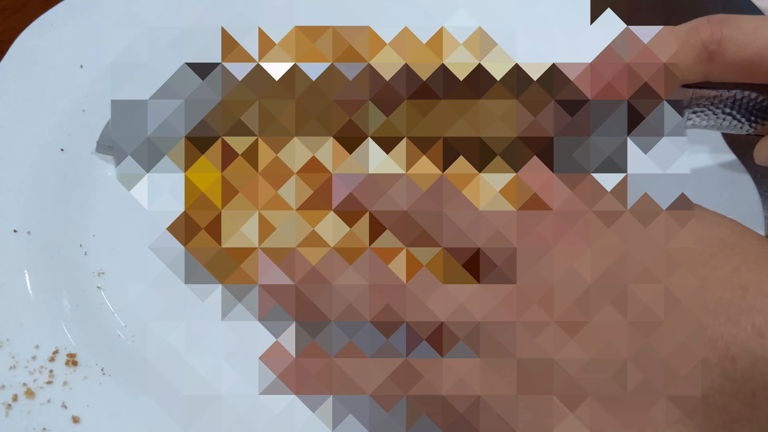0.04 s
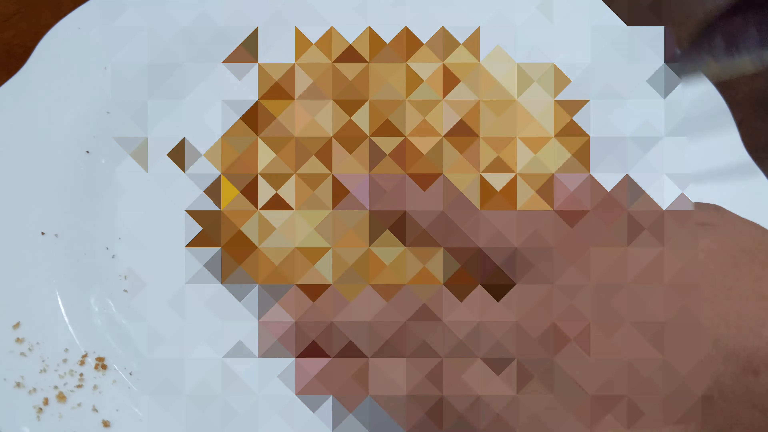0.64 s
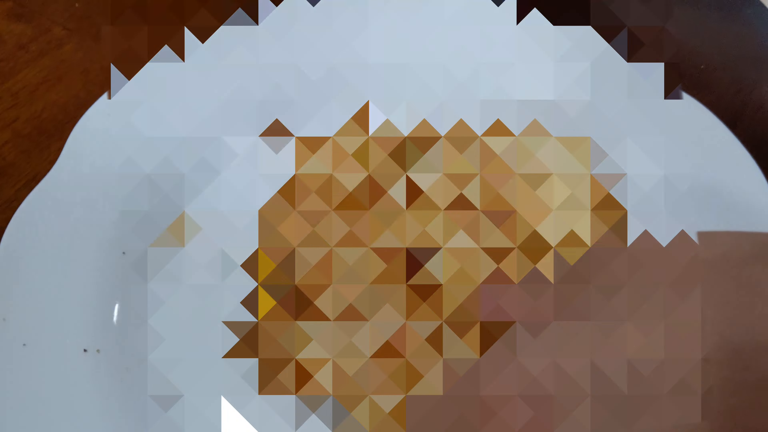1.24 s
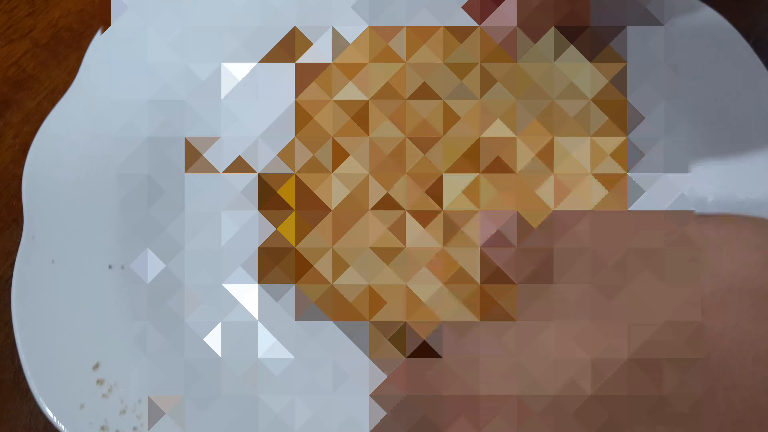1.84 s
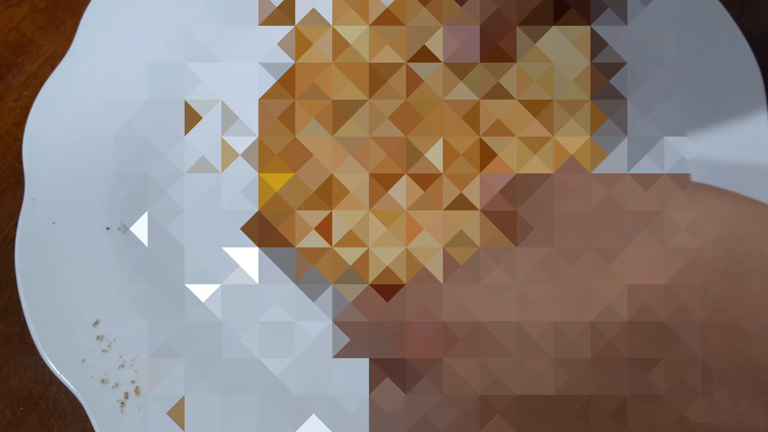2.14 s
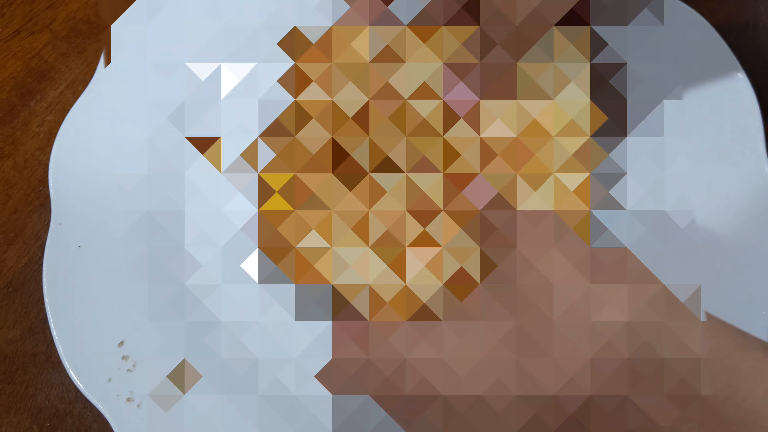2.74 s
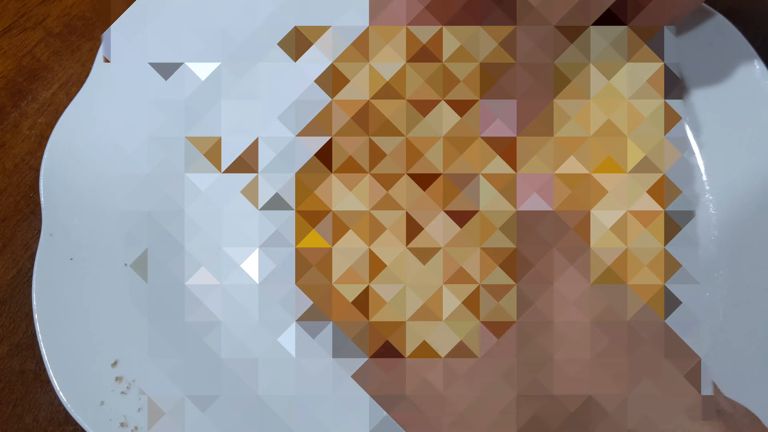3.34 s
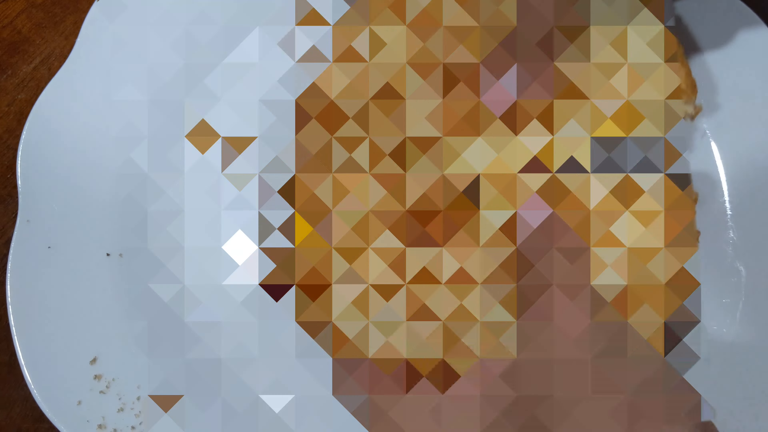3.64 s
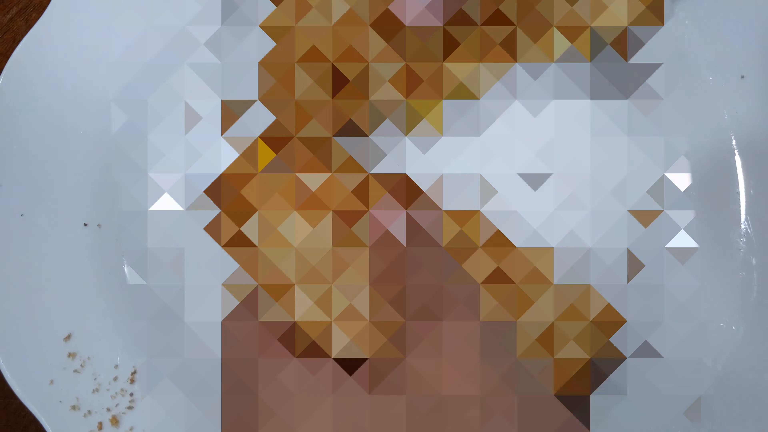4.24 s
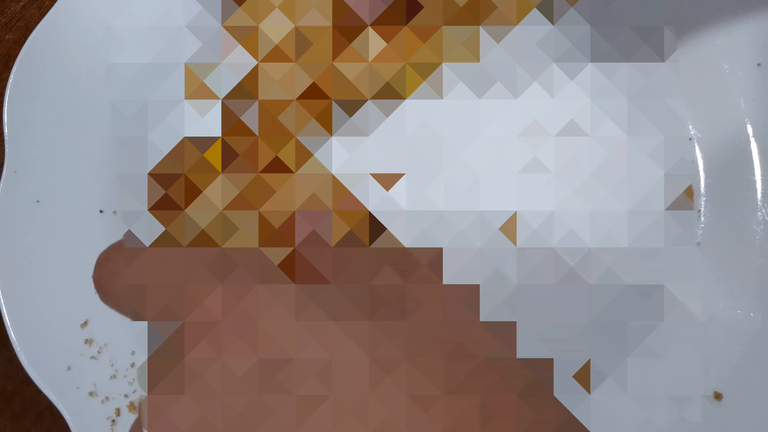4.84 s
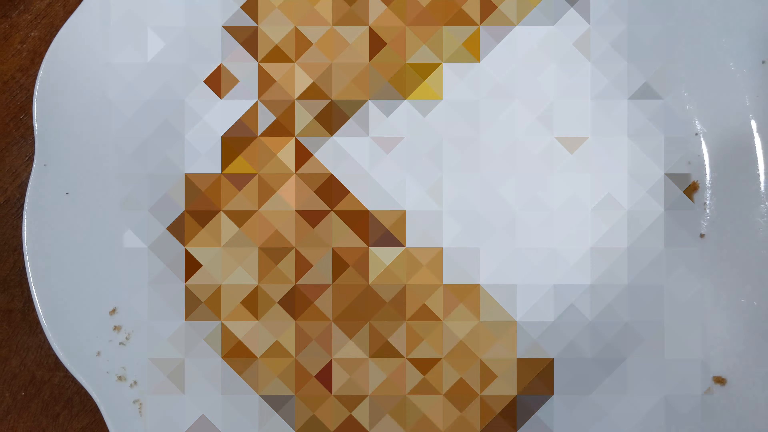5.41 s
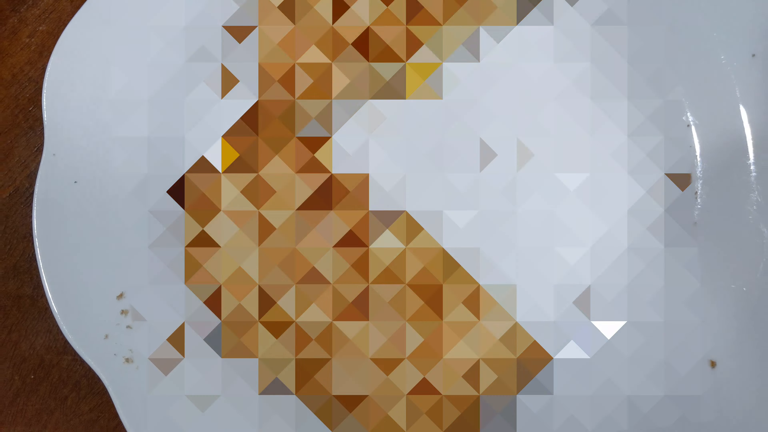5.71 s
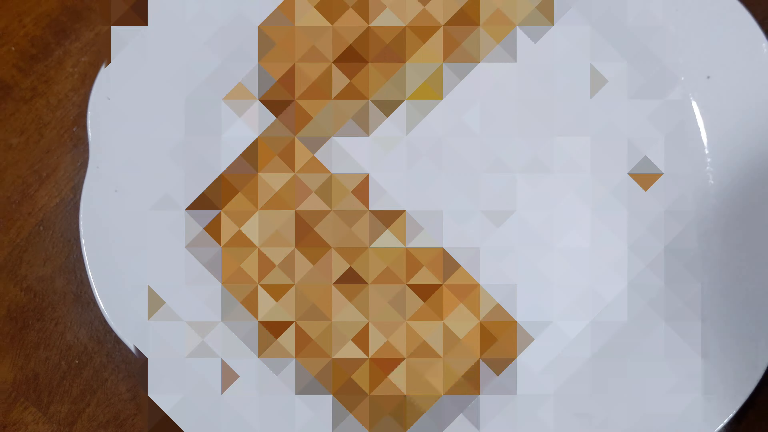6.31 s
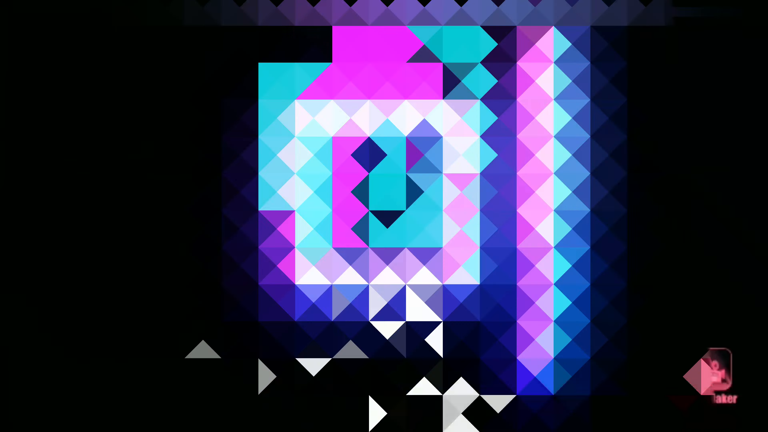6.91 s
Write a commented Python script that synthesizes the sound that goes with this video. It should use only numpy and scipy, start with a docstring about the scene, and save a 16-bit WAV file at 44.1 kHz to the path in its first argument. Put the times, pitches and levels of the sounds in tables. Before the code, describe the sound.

A knife clanks and rings on a ceramic plate, the plate clacks down, then toast crackles softly as it is pulled apart.

```python
"""A quiet kitchen, the microphone close to a ceramic plate on a wooden table. A toasted sandwich is cut:
the knife knocks through, scrapes out over the glaze and is put down ringing. The plate is turned, rocks
and clacks down, shaking the table. Then the halves are pulled apart, the crust rustling and snapping
softly. Behind it lie room air, an appliance hum, a far engine and a thin whistle, until all fades out."""
import sys
import numpy as np
from scipy import signal
from scipy.fft import rfft, irfft
from scipy.io import wavfile

SR = 44100
rng = np.random.default_rng(int(sys.argv[2]) if len(sys.argv) > 2 else 0)


def dump(signal):
    """Clip the signal to [-1, 1] and save it as 16-bit WAV at the path in sys.argv[1]."""
    limited = np.clip(np.atleast_2d(signal).T, -1, 1)
    pcm = np.round(limited * 32767).astype(np.int16)
    wavfile.write(sys.argv[1], SR, pcm)


N = 307377
T = np.arange(N) / SR
HZ = np.fft.rfftfreq(N, 1 / SR)

# modes of the gripped blade: f/Hz, level/dB, t60/s
BLADE_MODES = [(2108, 2, 0.049), (2265, 0.5, 0.044), (2420, -20, 0.34), (2955, -6, 0.014),
               (3760, -4.5, 0.032), (3950, -12, 0.014), (5195, -16.5, 0.04), (10360, -21.5, 0.1)]


def knife(room, let_go_s=0.6103, rock_db=3, rock_period_s=.245):
    """Close up, the gripped blade clanks on the plate; once let go it rings on, swelling as it rocks."""
    # blows on the plate: t/s, thud/dB, thud centre/Hz, table-top thump/dB, crack/dB, blade clank/dB
    blows = [(0.0186, -31.5, 1230, -54, -23.5, -38), (0.223, -8, 400, -23, -21.5, -30.5),
             (0.2242, -3, 1093, -50, -16, -8), (0.3168, -31.5, 1302, -40.5, -35, -30.5),
             (0.6103, -3.5, 881, -44.5, -3.5, -10.5), (0.6134, -11.5, 710, -39.5, -21.5, -20.5)]
    # modes of the free knife: f/Hz, level/dB, t60/s
    steel_modes = [(306, -3, .26), (1400, -24, .95), (2105, -14, .65), (2213, -5, .9), (2412, -10, .9),
                   (3063, -17, .42), (3278, -1.5, .47), (2880, 5, .13), (3670, 3, .09), (4753, -6, .12),
                   (5706, -16, .2), (6352, -20, .2), (8780, -10, .08), (10630, -22, .16)]
    clanks = strikes(blows, BLADE_MODES, room, wood_db=-2.5, crack_hz=8050,
                     room_db=-4.5, ring_room_db=-8.5, ring_lag_ms=0.049)
    rocking = amp(rock_db * np.cos(2 * np.pi * T[:SR] / rock_period_s))
    free = np.zeros(N)
    add(free, let_go_s, amp(-19.5) * ring(steel_modes) * rocking)
    return clanks + at_microphone(free, room, room_db=-6, lag_ms=0.024)


def plate(room):
    """The turned plate tips, knocks on the table and clacks down."""
    # knocks and rebounds: t/s, thud/dB, thud centre/Hz, table-top thump/dB, crack/dB, plate ring/dB
    knocks = [(1.3334, -32, 900, -27, -32, -48), (1.3559, -38, 2400, -25, -32, -50),
              (1.3612, -24, 700, -26, -17, -35), (1.5704, -42.5, 2399, -70, -44, -63),
              (1.6151, 3.5, 720, -24, -15, -29), (1.6246, -7.5, 400, -43.5, -18, -42.5),
              (1.6275, -6, 1700, -47.5, -7, -20), (1.6428, -10.5, 596.3, -51.5, -20, -44),
              (1.9171, -36, 400, -39, -40, -58)]
    # modes of the ceramic plate: f/Hz, level/dB, t60/s
    plate_modes = [(2414, -20, .3), (4748, -6, .36), (5324, -14, .2), (5566, 0, .21), (8893, -10, .22),
                   (11930, -16, .2), (12270, -15, .2), (1521, -6, .2), (1960, 0, .09), (2380, 3, .08),
                   (3100, -3, .06), (4204, -14, .14), (6363, -21, .2), (7400, -14, .14), (10800, -15, .18)]
    return strikes(knocks, plate_modes, room, wood_db=-3.5, crack_hz=10500,
                   room_db=2, ring_room_db=-4.5, ring_lag_ms=0.0033)


def strikes(blows, modes, room, wood_db, crack_hz, room_db, ring_room_db, ring_lag_ms):
    """Blows of one object: each shakes the table and sets the object's own modes ringing."""
    # modes of the wood under the plate and of the whole table top: f/Hz, level/dB, t60/s
    wood_modes = [(313.1, -18.5, .24), (340, -13, 0.074), (479.4, -15, .13), (529, -12, .08),
                  (660, -22.5, 0.12), (703, -16.5, 0.13), (764, -20.5, 0.3), (816, -24.5, 0.14),
                  (1068, -27, .18), (1352, -14, 0.09), (1498, -12, 0.064), (1652, -20, 0.22),
                  (1945, -18.5, 0.028)]
    top_modes = [(147.8, -11.5, 0.22), (205, 0, 0.057)]
    wood, top, body = amp(wood_db) * ring(wood_modes), ring(top_modes), ring(modes)
    impacts, ringing = np.zeros((2, N))
    for s, thud_db, thud_hz, thump_db, crack_db, ring_db in blows:
        add(impacts, s, amp(thud_db) * thud(thud_hz, wood) + amp(crack_db) * crack(crack_hz))
        add(ringing, s, amp(thump_db) * top + amp(ring_db) * body)
    return (at_microphone(impacts, room, room_db, lag_ms=.13)
            + at_microphone(ringing, room, ring_room_db, ring_lag_ms))


def thud(hz, wood):
    """The push of one contact and the wood's answer to it."""
    force = push(hz, q=1.2)
    sound = signal.fftconvolve(wood, force)[:SR] / abs(rfft(force)).max()
    add(sound, 0, force)
    return sound


def crack(top_hz, rise_s=0.00059, decay_s=0.0048):
    """The gritty burst of noise at a hard contact."""
    t = T[:SR]
    grit = signal.lfilter(*signal.butter(2, [900, top_hz], "band", fs=SR), rng.standard_normal(SR))
    return .5 * unit(grit) * np.exp(-t / decay_s) * (1 - np.exp(-t / rise_s))


def scraping(room, blade_db=-6, drag_db=-49.5, lift_s=.56):
    """The blade rings as it grates over the glaze, dragging lightly between scrapes until it lifts."""
    # scrapes: peak t/s, length/s, level/dB
    scrapes = [(0.321, .04, -32), (0.388, .05, -26.5), (0.525, .05, -47)]
    # spectrum of steel on glaze: f/Hz, level/dB
    grating_spectrum = [(180, -46.5), (300, -8), (574, -29.5), (690, -2), (844, -13.5), (1220, -22.5),
                        (2130, -9), (3130, -21.5), (3660, -20.5), (4330, -28), (5630, -21.5), (6570, -29.5),
                        (12000, -30), (15600, -69), (22000, -120)]
    # modes of plate and table that a scrape drives: f/Hz, level/dB, t60/s
    rasp_modes = [(744, 1, .05), (838, 7, .07)]
    slips = friction(room, per_s=160, spread_db=3, hiss=.3)
    singing = unit(signal.oaconvolve(slips, ring(rasp_modes + BLADE_MODES)[None], axes=1)[:, :N])
    drag = amp(drag_db) * np.clip((lift_s - T) / .05, 0, 1)
    pressure = drag + sum(amp(db) * stroke(s, length) for s, length, db in scrapes)
    return pressure * (colour(slips, grating_spectrum) + amp(blade_db) * singing)


def gripping(room, scratch_db=-8, scratch_s=0.009):
    """The sandwich is gripped: hollow ticks that start with a scratch, and soft bumps on the plate."""
    # ticks: t/s, level/dB, treble against the lowest mode/dB
    ticks = [(2.083, -67, 16), (2.205, -53, 1), (2.432, -49.5, 6), (2.4854, -35, -7), (2.6277, -50.5, -13),
             (2.7509, -48, -3), (2.969, -42.5, -5.5), (3.098, -46.5, 0), (3.2512, -50.5, -11),
             (4.2559, -55.5, 7), (4.389, -59.5, 19), (4.596, -61, 14), (4.7617, -49.5, 5),
             (4.8125, -62, 15.5), (4.88, -67, 14), (4.996, -57, 14), (5.072, -56.5, 12)]
    # modes of the ticks: f/Hz, level/dB, t60/s
    tick_modes = [(1648, 0, .12), (2094, -14, .12), (2560, -8, .06), (2624, -5, .08), (3990, -12, .07),
                  (4590, -12, .11), (5679, -21, .12), (6160, -15, .24), (6896, -23, .13), (7343, -21, .14),
                  (7885, -18, .15), (8780, -18, .15), (10169, -16, .17), (11919, -19, .14),
                  (12349, -19, .14), (13205, -19, .14), (14018, -17, .17)]
    # bumps of bread and fingers: t/s, level/dB, centre f/Hz
    bumps = [(0.472, -33.5, 173), (0.488, -33.5, 143), (0.504, -31, 190), (1.94, -39, 174.4),
             (2.431, -43, 584), (2.5391, -33, 510), (4.993, -36, 570)]
    taps = np.zeros(N)
    lowest, *upper = [ring([mode], attack_s=0.00028) for mode in tick_modes]
    shape = (len(ticks), len(upper))
    spots = rng.choice([-1, 1], shape) * rng.uniform(.3, 1.6, shape)  # each spot favours other modes
    for (s, db, treble_db), spot in zip(ticks, spots):
        scratch = amp(scratch_db) * rng.standard_normal(SR) * np.exp(-T[:SR] / scratch_s)
        add(taps, s, amp(db) * (lowest + amp(treble_db) * (spot @ upper + scratch)))
    for s, db, hz in bumps:
        add(taps, s, amp(db) * push(hz, q=2.7))
    return at_microphone(taps, room, room_db=-6, lag_ms=0.006)


def snapping(room, decay_s=0.00086):
    """The dry crust breaks near the microphone, each fracture a tiny burst of noise."""
    # snaps of the crust: t/s, level/dB, centre f/Hz
    snaps = [(2.3748, -31, 8000), (2.4765, -34, 10900), (2.8907, -42.5, 4000), (3.1598, -29, 11800),
             (3.1957, -38, 9920), (3.376, -29, 9000), (3.437, -36, 9220), (3.5118, -32, 12500),
             (3.5663, -36.5, 10200), (3.661, -29, 13450), (4.033, -47, 6000), (4.244, -44.5, 12000),
             (4.377, -47, 8000), (4.773, -20, 10500), (4.9283, -26, 11900), (4.9978, -38, 4450),
             (6.3833, -36, 12800), (6.579, -36, 13000)]
    crust = np.zeros(N)
    for s, db, hz in snaps:
        fracture = rng.standard_normal(SR // 20) * np.exp(-T[:SR // 20] / decay_s)
        snap = signal.fftconvolve(fracture, push(hz, q=5.0))
        add(crust, s, amp(db) * snap / abs(snap).max())
    return at_microphone(crust, room, room_db=-11, lag_ms=0.027)


def rubbing(room, tear_start_s=2.3, tear_end_s=4.7):
    """Fingers rub on toast, and single crumbs crack while the halves come apart."""
    # strokes of fingers and crust: peak t/s, length/s, crisp treble/dB, dull body/dB
    rubs = [(0.515, .08, -39.5, -59), (0.94, .07, -63, -50), (1.078, .09, -45.5, -56),
            (2.461, 0.068, -60, -52.5), (2.664, 0.042, -62, -56), (2.897, 0.063, -58, -47),
            (3.348, 0.15, -61, -61.5), (3.655, 0.053, -54, -77), (4.123, 0.07, -62.5, -64),
            (4.29, 0.11, -68, -62), (4.387, 0.076, -61, -62), (4.622, 0.044, -60, -56),
            (4.796, 0.11, -51.5, -60), (5.001, 0.042, -53, -51), (6.273, 0.18, -53, -61.5),
            (6.461, .08, -57, -75.5), (6.515, 0.022, -61, -49.5), (6.601, 0.047, -82, -46)]
    # faint rustle of toast under the hand, between strokes: t/s, level/dB
    rustle = [(0, -50.5), (0.45, -45.5), (0.8, -57.5), (2.2, -62), (2.9, -59), (3.55, -64.5), (3.8, -78),
              (4.7, -71), (4.95, -57.5), (5.25, -76.5), (6.1, -86.5), (6.4, -69), (6.7, -70)]
    # spectra of the toast's crisp treble and dull body: f/Hz, level/dB
    crisp = [(2500, -14), (5000, -2.5), (7200, -5), (9500, 2.5), (13000, -5), (16000, -18)]
    dull = [(500, -17.5), (1200, 0), (2400, 8), (4000, -3.5), (6500, -20.5)]
    treble_gain, body_gain = level(rustle), level(rustle)
    for s, length, treble_db, body_db in rubs:
        swell = stroke(s, length)
        treble_gain += amp(treble_db) * swell
        body_gain += amp(body_db) * swell
    grains = friction(room, per_s=630, spread_db=7.0, hiss=0.997)
    crumbs = at_microphone(clicks(per_s=80, spread_db=4.0, cap=3), room, room_db=-5.5, lag_ms=0.014)
    tearing = (T > tear_start_s) & (T < tear_end_s)
    treble = amp(-3) * colour(grains, crisp) + amp(-5) * tearing * colour(crumbs, crisp)
    body = amp(-4) * colour(grains, dull) + amp(-11) * tearing * colour(crumbs, dull)
    return treble_gain * treble + body_gain * body


def friction(room, per_s, spread_db, hiss):
    """Many tiny slips of uneven size, with their reflections, over a smooth hiss."""
    slips = unit(clicks(per_s, spread_db, cap=3.5) * amp(2 * drift(25)))
    return unit(at_microphone(slips, room, room_db=-3, lag_ms=0.042)) + hiss * diffuse(N)


def room_air(air_db=-51.5):
    """The kitchen's steady noise from all sides, mostly low rumble."""
    # spectrum of the air: f/Hz, level/dB
    air_spectrum = [(15, -13.5), (28, -0.5), (50, -8), (85, -11), (130, -14), (200, -16.5), (300, -20.5),
                    (450, -23.5), (900, -26.5), (2100, -32.5), (4000, -36.5), (7000, -41.5), (11000, -38),
                    (16000, -47.5)]
    return amp(air_db) * colour(diffuse(N) + 0.25 * rng.standard_normal((2, N)), air_spectrum)


def appliance_hum(hz=361, db=-63.5):
    """An appliance hums on one slightly wavering note."""
    return glide([(0, hz, db), (T[-1], hz, db)], waver=0.0015)


def far_engine():
    """Far off, an engine pulls up through its gears."""
    # engine note: t/s, f/Hz, level/dB
    revs = [(0, 76, -53), (0.95, 66, -53.5), (1.25, 68.2, -46.5), (2.05, 108.9, -59), (2.5, 133.6, -47),
            (2.9, 158.5, -53.5), (3.15, 173.4, -69.5), (3.8, 180, -72.5), (4.35, 137.6, -59),
            (4.8, 126, -70.5), (5.15, 138, -54.5), (5.45, 149, -48.5), (5.82, 165, -65.5),
            (6.1, 177, -55.5), (6.75, 203, -55.5)]
    return glide(revs, waver=0.0063)


def far_whistle():
    """A thin whistle rises and falls in the distance."""
    # whistle note: t/s, f/Hz, level/dB
    arc = [(5.3, 2980, -83), (5.37, 3280, -75.5), (5.5, 3420, -74), (5.62, 3400, -74), (5.75, 3324, -82),
           (5.87, 2900, -81)]
    return glide(arc, waver=0.0038)


def kitchen(early_db=4.5, early_t60=0.15, late_db=-8.5, onset_s=0.00029):
    """Dense reflections from the table and near walls, then a tail dying band by band."""
    # reverberation time: f/Hz, t60/s
    decay_times = [(100, 1), (300, 0.58), (700, 0.5), (1500, 0.61), (3000, 0.72), (6000, 0.64),
                   (14000, 0.25)]
    t = T[:SR]
    hz, frame_s, bands = signal.stft(diffuse(SR), SR, nperseg=256)
    decay = amp(-60 * frame_s / curve_at(decay_times, hz)[:, None])
    tail = signal.istft(bands * decay, SR, nperseg=256)[1][:, :SR]
    early = diffuse(SR) * amp(-60 * t / early_t60)
    onset = 1 - np.exp(-(t / onset_s) ** 2)
    return (amp(early_db) * unit(early * onset) + amp(late_db) * unit(tail * onset)) / np.sqrt(SR)


def at_microphone(direct, room, room_db, lag_ms):
    """The direct sound reaches the microphone's left port first; the room's reflections follow."""
    right = irfft(rfft(direct) * np.exp(-2j * np.pi * HZ * lag_ms / 1000), N)
    reflections = signal.oaconvolve(amp(room_db) * direct[None], room, axes=1)[:, :N]
    return np.array([direct, right]) + reflections


def diffuse(size, spacing_m=0.17):
    """Noise from all sides at two ports: alike in the bass, unrelated in the treble."""
    left, other = rfft(rng.standard_normal((2, size)))
    coherence = np.sinc(2 * np.fft.rfftfreq(size, 1 / SR) * spacing_m / 343)
    right = coherence * left + np.sqrt(1 - coherence ** 2) * other
    return irfft(np.array([left, right]), size)


def ring(modes, attack_s=0.00061):
    """Dying sines of one struck object; successive modes start in opposite directions."""
    t = T[:SR]
    sines = sum((-1) ** k * amp(db - 60 * t / t60) * np.sin(2 * np.pi * hz * t)
                for k, (hz, db, t60) in enumerate(modes))
    return sines * (1 - np.exp(-t / attack_s))


def push(hz, q):
    """The short force pulse of one contact, centred on hz, with peak 1."""
    pulse = signal.lfilter(*signal.iirpeak(hz, q, SR), signal.unit_impulse(SR // 8))
    pulse = signal.lfilter(*signal.butter(1, min(2 * hz, SR / 2.5), fs=SR), pulse)
    return pulse / abs(pulse).max()


def clicks(per_s, spread_db, cap):
    """Random impulses of either sign, the largest cap * spread_db above the smallest."""
    impulses = (rng.random(N) < per_s / SR) * rng.choice([-1, 1], N)
    return impulses * amp(spread_db * np.minimum(rng.exponential(1, N), cap))


def stroke(peak_s, length_s, rise_share=.4):
    """Gain of one stroke: a quick swell and a slower release."""
    width = length_s * np.where(T < peak_s, rise_share, 1 - rise_share)
    return np.exp(-np.minimum(abs(T - peak_s) / width, 10) ** 2)


def glide(rows, waver):
    """A tone that follows its pitch and level curves, slightly unsteady in both."""
    s, hz, _ = np.transpose(rows)
    turns = np.cumsum(np.interp(T, s, hz) * (1 + waver * drift(23))) / SR
    return np.sqrt(2) * level(rows, column=2) * np.sin(2 * np.pi * turns) * amp(2.5 * drift(18))


def drift(cutoff_hz):
    """Slow random wander of unit RMS."""
    return unit(irfft(rfft(rng.standard_normal(N)) / (1 + (HZ / cutoff_hz) ** 4), N))


def colour(x, spectrum):
    """Filter x by a spectrum, to unit RMS."""
    return unit(irfft(rfft(x) * amp(curve_at(spectrum, HZ)), N))


def curve_at(points, hz):
    """Interpolate over log frequency."""
    f, value = np.transpose(points)
    return np.interp(np.log(hz + 1), np.log(f + 1), value)


def level(rows, column=1):
    """Gain over time from a dB column, silent outside its span."""
    rows = np.asarray(rows)
    return amp(np.interp(T, rows[:, 0], rows[:, column], left=-140, right=-140))


def add(mix, s, sound):
    """Mix a sound in at s seconds."""
    part = mix[round(s * SR):][:len(sound)]
    part += sound[:len(part)]


def amp(db):
    return 10 ** (np.asarray(db) / 20)


def unit(x):
    return x / np.sqrt(np.mean(x ** 2) + 1e-20)


def scene():
    """Knife, plate and toast close up, the background well behind."""
    room = kitchen()
    close = knife(room) + plate(room) + scraping(room) + gripping(room) + snapping(room) + rubbing(room)
    return close + room_air() + appliance_hum() + far_engine() + far_whistle()


def record(dry, edge_hz=16000):
    """The unequal colour of the microphone's two ports, a closing fade, then the band limit."""
    # how much louder the left port hears than the right: f/Hz, level/dB
    port_balance = [(60, 2), (110, 2), (200, 0.5), (380, -1), (700, 4), (1290, -2.0), (2380, -3.0),
                    (4400, 0.5), (8120, 2), (15000, -10.5)]
    # fader, held at its first level until the fade: t/s, level/dB
    fader = [(6.55, -8.5), (6.65, -16.5), (6.72, -24), (6.77, -34), (6.785, -65.5)]
    ported = irfft(rfft(dry) * amp(np.outer([.5, -.5], curve_at(port_balance, HZ))), N)
    faded = ported * amp(np.interp(T, *np.transpose(fader)))
    lowpass = signal.firwin(255, edge_hz, window=("kaiser", 9), fs=SR)
    return signal.oaconvolve(faded, lowpass[None], "same")


dry = scene()
out = record(dry)
dump(out)
```